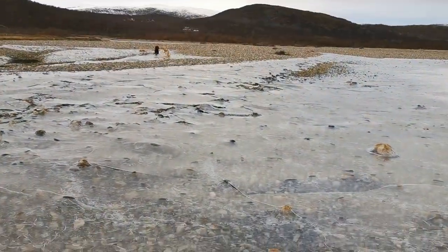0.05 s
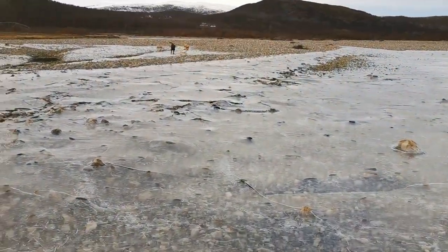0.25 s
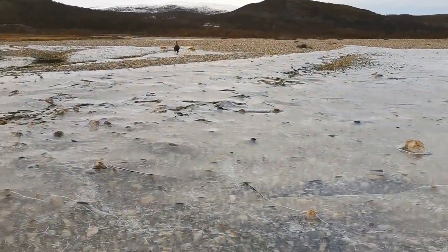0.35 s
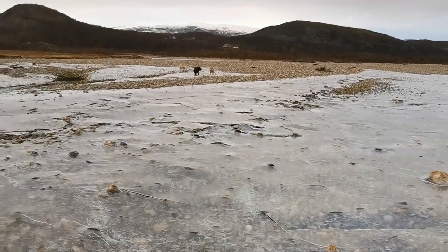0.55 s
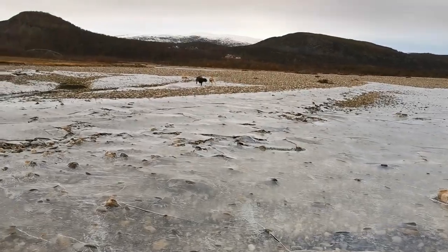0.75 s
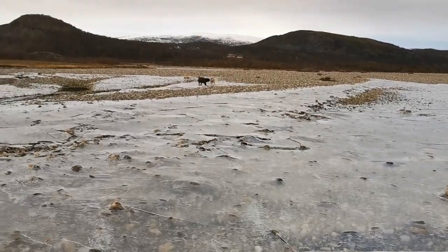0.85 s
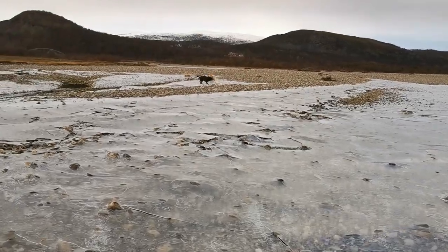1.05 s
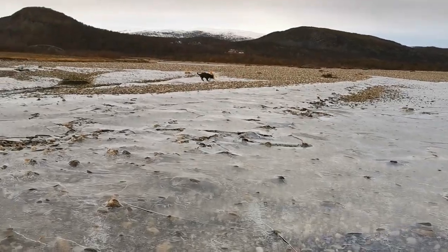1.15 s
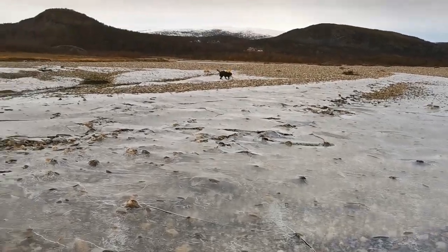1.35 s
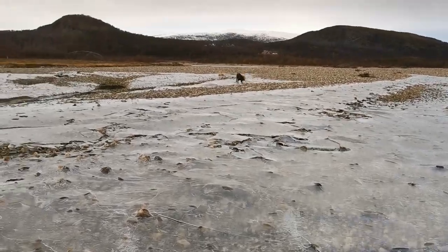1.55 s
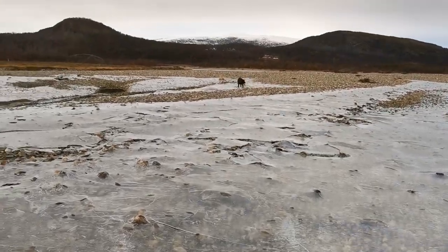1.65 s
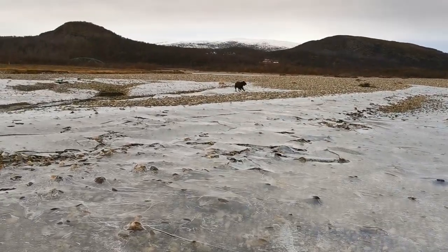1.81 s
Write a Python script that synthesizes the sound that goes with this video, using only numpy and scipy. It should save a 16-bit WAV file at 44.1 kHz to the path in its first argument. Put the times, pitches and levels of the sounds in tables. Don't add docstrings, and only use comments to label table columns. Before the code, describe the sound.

Thin ice breaks under slow boots on an open river flat: small creaking cracks, then three hard treads with hollow thumps, sharp snaps, wet crunching and clinking shards, heard close on a handheld stereo microphone.

```python
import sys
import numpy as np
from scipy import signal
from scipy.fft import rfft, irfft, next_fast_len
from scipy.io import wavfile
from scipy.ndimage import map_coordinates

SR = 44100
rng = np.random.default_rng(int(sys.argv[2]) if len(sys.argv) > 2 else 0)


def linear_from_db(decibels):
    return 10 ** (np.asarray(decibels, float) / 20)


def int16_out(signal):
    q = np.round(np.clip(np.atleast_2d(signal).T, -1, 1) * 32767)
    wavfile.write(sys.argv[1], SR, q.astype(np.int16))


N = 81585
TIME = np.arange(N) / SR

# frequency in Hz, level in dB per Hz.
WET_COLOUR = [(300, -38), (900, 21), (4000, -1.5), (16000, -10.5)]


def unit(x):
    return x / np.sqrt(np.mean(x ** 2) + 1e-20)


def along(points, hz):
    f, v = np.transpose(points)
    return np.interp(np.log(hz + 1), np.log(f + 1), v)


def curve(rows, s):
    return np.interp(s, *np.transpose(rows))


def wobble(rate):
    knots = rng.standard_normal(int(N * rate / SR) + 4)
    return map_coordinates(knots, [np.arange(N) * rate / SR])


def coloured(x, db_of_hz):
    m = 2 * next_fast_len(N // 2 + 4096)
    gain = linear_from_db(db_of_hz(np.fft.rfftfreq(m, 1 / SR)))
    cep = irfft(np.log(gain + 1e-6), m)
    cep[..., 1:m // 2] *= 2
    cep[..., m // 2 + 1:] = 0
    return irfft(rfft(x, m) * np.exp(rfft(cep)), m)[..., :N]


def wide_noise(side, colour):
    parts = rng.standard_normal((3, N))
    return unit(coloured(parts[0] + side * parts[1:], lambda f: along(colour, f)))


def rings(s, hz, gain, t60, place, size):
    lag_s, lag_scatter_s, pan_db, rise_s = .00005, .00004, 0.5, 0.00011
    hz = np.minimum(hz, 17000)[:, None]
    out = []
    for side in (.5, -.5):
        start = s + side * (lag_s + lag_scatter_s * place[:, 0])
        index = np.floor(s * SR).astype(int)[:, None] - 16 + np.arange(size)
        t = np.maximum(index / SR - start[:, None], 0)
        level = (gain * linear_from_db(side * pan_db * place[:, 1]))[:, None]
        envelope = linear_from_db(-60 * t / t60[:, None]) * (1 - np.exp(-t / rise_s))
        wave = level * envelope * np.sin(2 * np.pi * hz * t)
        out.append(np.bincount(np.clip(index, 0, N).ravel(), wave.ravel(), N + 1)[:N])
    return np.array(out)


def air():
    hiss = coloured(rng.standard_normal((2, N)), lambda f: along(WET_COLOUR, f))
    return linear_from_db(-63) * unit(hiss)


def wind():
    thuds = coloured(rng.standard_normal((2, N)), lambda f: along([(25, 3), (60, 12), (110, -44)], f))
    puff_db = 16 * np.exp(-((TIME - .63) * 14) ** 2)
    return unit(thuds) * linear_from_db(-58.5 + 3.7 * wobble(9.6) + puff_db)


def groan():
    # time in seconds, level in dB.
    sag = [(0, -42), (.16, -47), (.18, -54.5), (.46, -41.5), (.6, -46.5), (.72, -59), (.8, -48),
           (1.0, -52.5), (1.2, -45), (1.5, -52), (1.7, -53), (1.85, -43)]
    # frequency in Hz, level in dB per Hz.
    groan_colour = [(30, -35), (150, -0.5), (305, -2.5), (500, -18), (800, -85.5)]
    low = wide_noise(0.035, groan_colour)
    return low * linear_from_db(curve(sag, TIME) + 1.13 + 3.96 * wobble(26.3))


def treads():
    # start in seconds, peak in dB, hollow pitch in Hz, t60 in seconds.
    boot_falls = [(0.246, -12.5, 305, 0.081), (.248, -18.5, 115.7, 0.17), (.345, -38, 214, .08),
                  (.385, -32.5, 187, .15), (0.74, -19, 187, 0.087), (.74, -18, 283, 0.037),
                  (0.776, -27.5, 246.6, 0.086), (.93, -34.5, 215, 0.059), (1.009, -22.5, 228, 0.12),
                  (1.112, -25.5, 288, 0.12), (1.139, -22, 223, 0.085), (1.184, -33.5, 220, 0.11),
                  (1.3074, -16.5, 195, 0.09), (1.334, -23, 286.6, 0.092), (1.568, -30.5, 336, 0.069),
                  (1.59, -32, 308, 0.11)]
    # ratio to its pitch, level in dB.
    hollow_modes = [(1, 4), (1.6, -6), (2.6, -12.5)]
    # frequency in Hz, level in dB per Hz.
    thud_colour = [(50, -32), (150, 13), (320, 4), (800, -3.5), (1500, -42.5)]
    tread_db, thud_db = -1.5, -4.5
    out = np.zeros(N + SR)
    t = np.arange(SR // 3) / SR
    rough = unit(coloured(rng.standard_normal(N), lambda f: along(thud_colour, f)))
    rough = np.pad(rough, (0, SR))
    for s, db, hz, t60 in boot_falls:
        i = round(s * SR)
        ring = 0
        for ratio, level in hollow_modes:
            fade = linear_from_db(level - 60 * t * np.sqrt(ratio) / t60)
            ring = ring - fade * np.sin(2 * np.pi * ratio * hz * t)
        thud = linear_from_db(thud_db - 40 * t / t60) * np.clip(t * hz, 0, 1) * rough[i:i + len(t)]
        out[i:i + len(t)] += linear_from_db(db + tread_db) * (ring + thud)
    return out[:N] * np.ones((2, 1))


def crushing_db():
    # start in seconds, strength in dB, hold in seconds, fall in dB/s.
    plate_breaks = [(0, -53.5, 0.014, 79), (0.203, -50.5, 0.02, 200), (0.246, -24.5, 0.021, 300),
                    (0.277, -24, 0.02, 400), (0.332, -32, 0.013, 84), (0.444, -37.5, 0.027, 298),
                    (0.505, -35, 0.032, 405), (0.571, -49.5, 0.08, 143), (0.7388, -25, 0.014, 167),
                    (0.818, -33, 0.025, 146), (0.927, -40.5, 0.0067, 92), (1.007, -36, 0.012, 213),
                    (1.109, -39.5, 0.025, 402), (1.185, -47, 0.016, 100), (1.255, -48, 0.019, 501),
                    (1.307, -36, 0.049, 300), (1.335, -28, 0.046, 319), (1.442, -43, 0.028, 207),
                    (1.509, -45.5, 0.027, 295), (1.563, -37, 0.052, 340), (1.667, -50.5, 0.078, 198),
                    (1.789, -43, .07, 98)]
    s, db, hold, fall = np.transpose(plate_breaks)[:, :, None]
    t = TIME - s
    onset = np.clip(t / 0.00051, 0, 1)
    power = linear_from_db(2 * (db - fall * np.maximum(t - hold, 0))) * onset
    return 10 * np.log10(power.sum(0) + 1e-9)


def crunch(count=6000):
    grit_db, spread_db, slush_db = 1.5, 2.6, -2.5
    grit_hz, grit_octaves, grit_cycles = 2297, 1.147, 5.46
    u, g = rng.random((count, 2)), rng.standard_normal((count, 3))
    s = u[:, 0] * (N - 1) / SR
    level_db = crushing_db()
    clump_db = np.clip(1.8 * wobble(90) + 2.2 * wobble(350), -15, 4)
    hz = np.clip(grit_hz * 2 ** (grit_octaves * g[:, 0]), 750, 9000)
    size = linear_from_db(-spread_db * np.log(u[:, 1] + .03)) * np.sign(g[:, 0] * g[:, 1])
    life = np.clip(grit_cycles * 3 / hz, 0, .011)
    norm = np.sqrt(np.mean(size ** 2 * life) * count / (N / SR) / 28)
    grain_db = grit_db + (level_db + clump_db)[(s * SR).astype(int)]
    grit = rings(s, hz, size / norm * linear_from_db(grain_db), life, g[:, 1:], size=400)
    slush = wide_noise(1.6, WET_COLOUR)
    return grit + slush * linear_from_db(level_db + slush_db + .7 * clump_db)


def shards():
    # start in seconds, level in dB, pitch in Hz.
    ringing = [
        (.288, -17.5, 830),
        (.431, -23, 6870),
        (.461, -19.5, 1703),
        (.623, -23, 1330),
        (.835, -32, 1020),
        (.942, -24.5, 1610),
        (1.385, -15, 819),
        (1.401, -23.5, 814),
        (1.449, -21.5, 811),
    ]
    s, db, hz = np.transpose(ringing)
    t60 = .042 * (1000 / hz) ** 0.67
    return rings(s, hz, linear_from_db(db), t60, rng.standard_normal((len(s), 2)), size=3000)


def ice_dust():
    # start in seconds, peak in dB.
    sprays = [(0.191, -46), (0.2486, -29), (.355, -46), (.394, -53), (0.43, -42.5), (0.456, -49),
              (.494, -41), (.499, -42), (.519, -41), (.570, -52), (.608, -55), (.701, -63), (0.828, -42),
              (.893, -44), (0.979, -49), (1.070, -53.5), (1.097, -52), (1.138, -51), (1.315, -37),
              (1.417, -50), (1.475, -46), (1.596, -40), (1.682, -53), (1.702, -58), (1.833, -50),
              (0.508, -46), (0.6716, -45.5), (0.9328, -44.5), (1.007, -34.5), (1.11, -43), (1.3084, -32.5),
              (1.3354, -47), (1.805, -39)]
    spray_db, spray_t60 = 11, 0.026
    s, db = np.transpose(sprays)[:, :, None]
    t = TIME - s
    fade = linear_from_db(db + spray_db - 60 * np.maximum(t, 0) / spray_t60)
    shape = (fade * np.clip(t / .002, 0, 1)).sum(0)
    dust = wide_noise(1.6, [(3000, -5), (7000, -11.5)])
    return dust * shape * linear_from_db(5.7 * wobble(250))


def ticks():
    # start in seconds, peak in dB, brightest frequency in Hz.
    fractures = [(0.2814, -9, 3050), (0.319, -19, 3230), (0.332, -23, 1520), (0.3424, -17, 3360),
                 (0.3546, -10.5, 2030), (0.418, -20, 2000), (0.4574, -21, 1670), (0.5177, -22, 3480),
                 (0.5254, -24.5, 2520), (0.5374, -25, 2860), (0.5504, -24, 2130), (0.5698, -29, 4360),
                 (0.605, -22.5, 2100), (0.7399, -17, 3900), (0.7554, -8, 3540), (0.7655, -9, 3880),
                 (0.7744, -10, 3600), (0.7804, -18, 3880), (0.8265, -14, 3280), (0.832, -14, 4750),
                 (0.8545, -19, 4020), (0.9637, -25, 3180), (0.981, -28, 4420), (1.07, -32, 2890),
                 (1.1384, -23.5, 4600), (1.2406, -32, 4160), (1.2617, -30, 3540), (1.3144, -14.5, 3820),
                 (1.3344, -13.5, 2500), (1.3428, -8.5, 2100), (1.3438, -12.5, 2520), (1.347, -22, 4770),
                 (1.3534, -16, 1940), (1.3589, -12, 1480), (1.3635, -15.5, 1480), (1.3691, -12, 2780),
                 (1.371, -14, 4030), (1.3754, -16, 3970), (1.3794, -16, 3000), (1.3874, -14, 2100),
                 (1.3914, -30, 4010), (1.4174, -20.5, 4110), (1.432, -29, 4590), (1.517, -34, 3140),
                 (1.6122, -21, 3140), (1.662, -33.5, 3150), (1.7937, -36, 4750), (1.8327, -26.5, 4560)]
    # ratio to the brightest frequency, level in dB.
    click_parts = [(.3, -13.5), (.6, -3), (1, 3), (1.25, -4.5), (2.6, -15)]
    tick_db, cycles, late_s = -1, 3.2, .0008
    s, db, hz = np.transpose(fractures)
    place = 0.25 * rng.standard_normal((len(s), 2))
    out = np.zeros((2, N))
    for ratio, level in click_parts:
        pitch = ratio * hz
        out += rings(s + late_s, pitch, linear_from_db(db + tick_db + level), cycles * 3 / pitch, place, size=300)
    return out


def cracks(count=9):
    # start in seconds, level in dB, shard pitch in Hz.
    sheet_cracks = [(0.1607, -25.5, 1150), (0.1928, -26, 1460), (0.2187, -33.5, 1110), (0.2273, -21, 1670),
                    (0.2479, -14, 4080), (0.2518, -16, 2000), (0.2653, -19, 2430), (0.2775, -14, 1190),
                    (0.2814, -14, 3470), (0.3358, -21.5, 1370), (0.343, -23, 770), (0.3555, -16, 1980),
                    (0.4613, -20, 1620), (0.4985, -31, 3730), (0.507, -24, 1060), (0.5705, -23, 1100),
                    (0.5891, -26.5, 2070), (0.6073, -26, 1140), (0.6232, -34, 1300), (0.6723, -31, 5040),
                    (0.7401, -10.5, 3850), (0.7449, -26, 3830), (0.7562, -15, 1650), (0.7621, -13.5, 4280),
                    (0.7743, -22, 3600), (0.7851, -26, 3830),
                    (0.8103, -21, 1030), (0.8264, -18.5, 1010), (0.8554, -25, 4030), (0.9048, -32, 4500),
                   (0.9431, -24, 1500), (1.0067, -26, 894), (1.0223, -28.5, 3760), (1.1125, -25, 1090),
                   (1.1832, -25, 1070), (1.2533, -23.5, 1450), (1.2772, -33, 1300), (1.3075, -17, 680),
                   (1.3144, -32, 3930), (1.3352, -15, 1020), (1.2934, -41, 3800), (1.359, -16, 1020),
                   (1.3706, -27, 3900), (1.4176, -31, 950), (1.4497, -32, 860), (1.475, -25, 2880),
                   (1.508, -36, 980), (1.569, -23, 2920), (1.5828, -25, 800), (1.5955, -29, 820),
                   (1.6121, -23.5, 3160), (1.6398, -25.5, 2780), (1.682, -37.5, 1020), (1.7027, -26, 2180),
                   (1.7554, -33.5, 3000), (1.8066, -25, 915)]
    clink_db, clink_t60 = 1.5, 0.016
    snap_db, snap_cycles, snap_hz, snap_octaves = -3.5, 2.26, 3120, 0.91
    s, db, hz = np.transpose(sheet_cracks)
    place = rng.standard_normal((len(s), 2))
    out = rings(s, hz, linear_from_db(db + clink_db), clink_t60 * np.sqrt(1000 / hz), place, size=1200)
    for k in range(count):
        a, b, c = rng.standard_normal((3, len(s)))
        step = (k + .5) / count * 3.274 - 1.6 + 0.14 * a
        pitch = np.sqrt(snap_hz * hz) * 2 ** (snap_octaves * step)
        gain = linear_from_db(db + snap_db + 3 * c) * np.sign(c + a)
        out += rings(s + .0004 * abs(b), pitch, gain, snap_cycles * 3 / pitch, place, size=500)
    return out


def ground_scatter(ice):
    t = np.arange(SR // 10) / SR
    tail = rng.standard_normal((2, len(t))) * linear_from_db(-60 * t / .03)
    echo = signal.fftconvolve(ice, tail / np.linalg.norm(tail[0]), axes=1)[:, :N]
    return linear_from_db(-11) * echo


def scene():
    ice = crunch() + shards() + ice_dust() + ticks() + cracks()
    return air() + wind() + groan() + treads() + ground_scatter(ice) + ice


def band_limit(x):
    return signal.sosfilt(signal.butter(12, 16500, fs=SR, output="sos"), x)


def record(dry):
    # frequency in Hz, level in dB.
    port_response = [(20, -12.5), (90, -2.5), (900, -2), (2300, -2.5), (4200, 6.5), (5200, 2.5), (6500, -3),
                     (9500, -12), (15600, -6.5), (16500, -45)]
    # frequency in Hz, left over right in dB.
    left_over_right = [(60, 5), (180, 3), (550, 3.5), (1650, -5.5), (4970, -9), (15000, -1.5)]
    halves = np.array([[.5], [-.5]])
    heard = coloured(dry, lambda f: along(port_response, f) + halves * along(left_over_right, f))
    return band_limit(np.tanh(heard))


dry = scene()
out = record(dry)
int16_out(out)
```